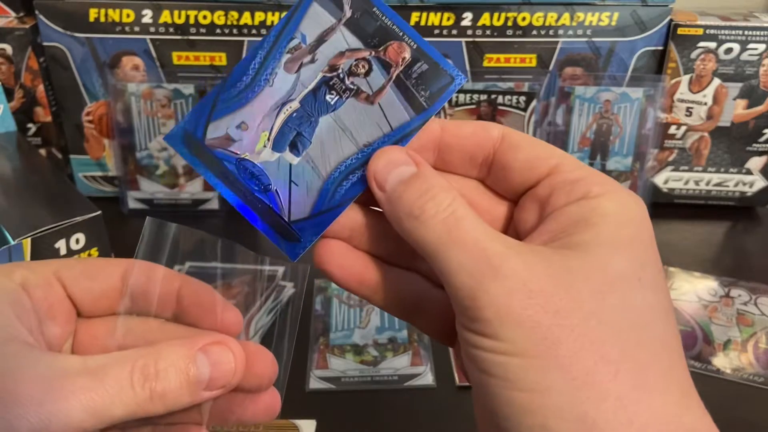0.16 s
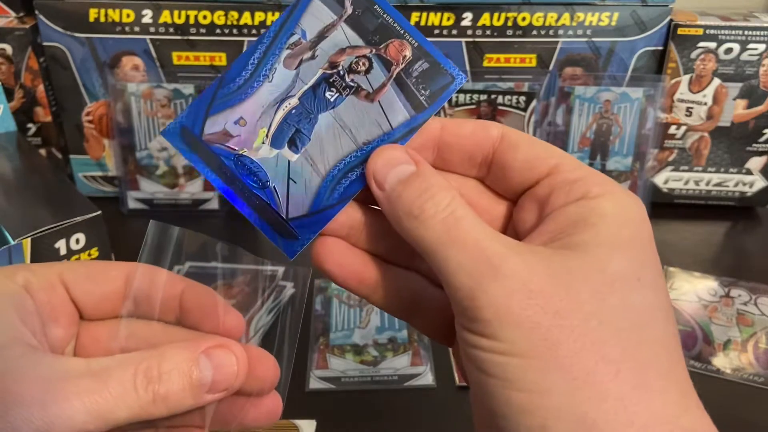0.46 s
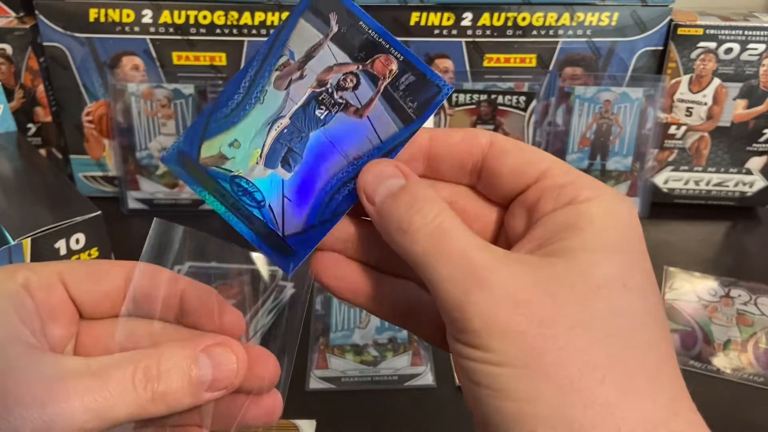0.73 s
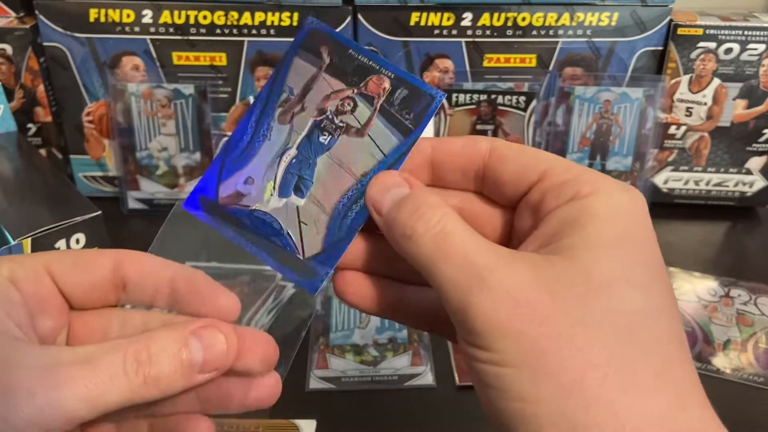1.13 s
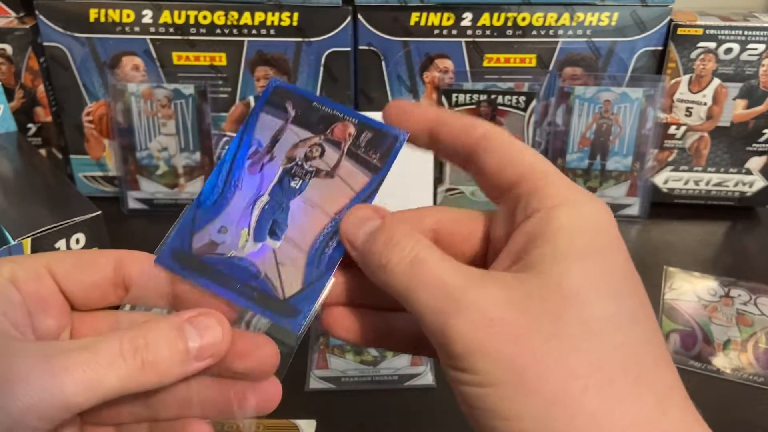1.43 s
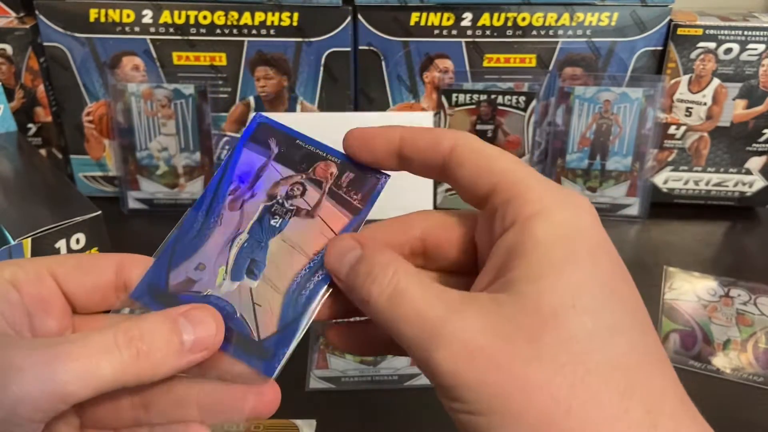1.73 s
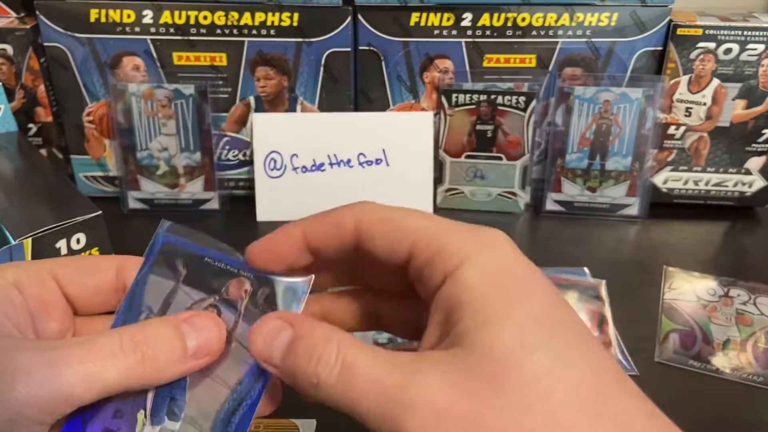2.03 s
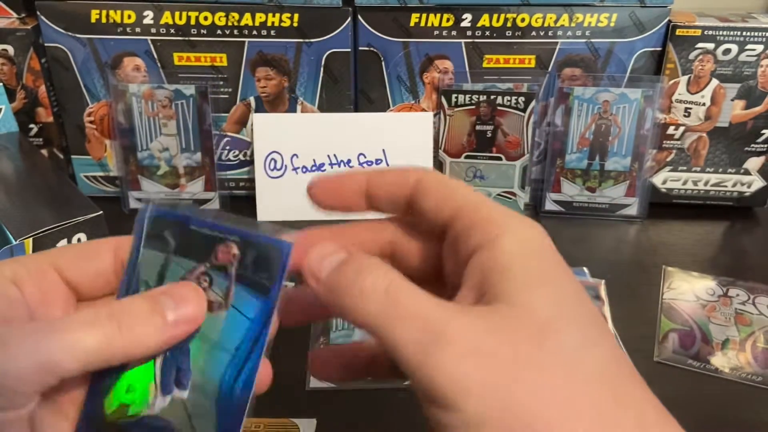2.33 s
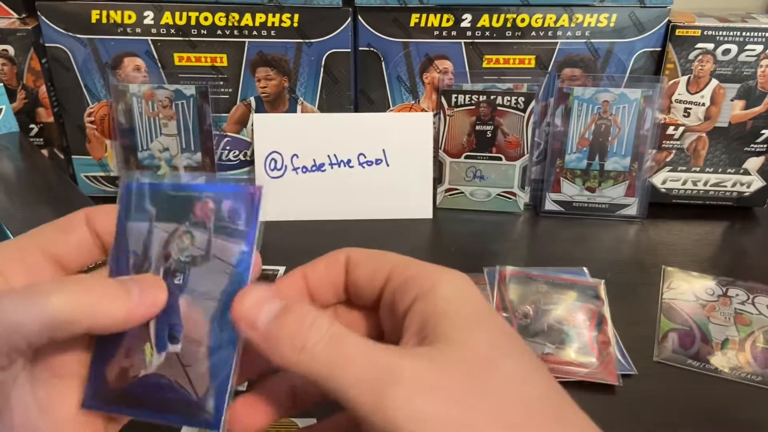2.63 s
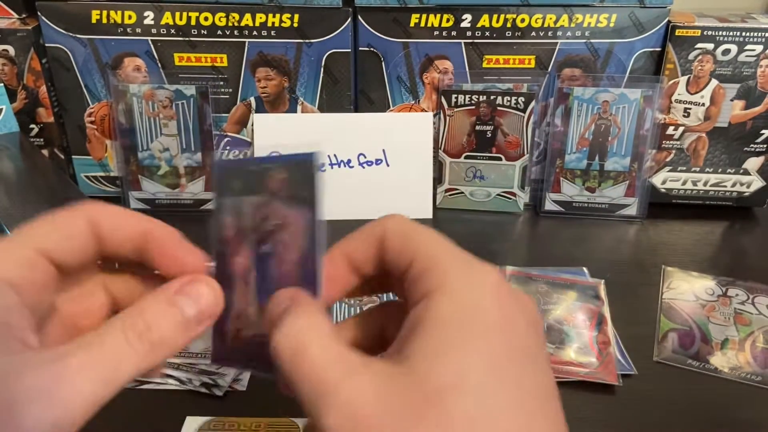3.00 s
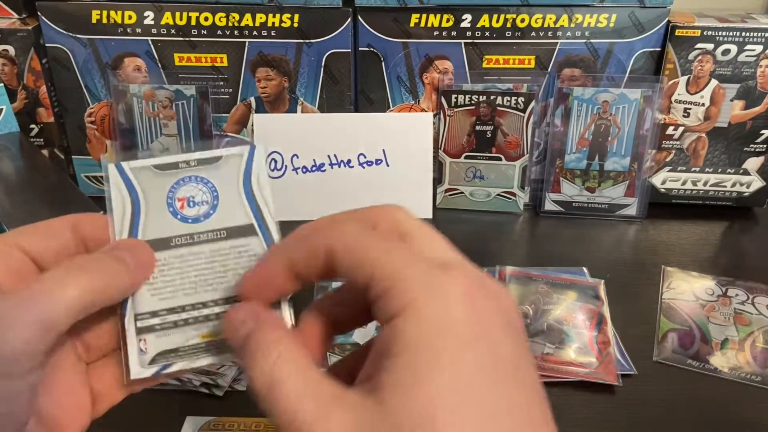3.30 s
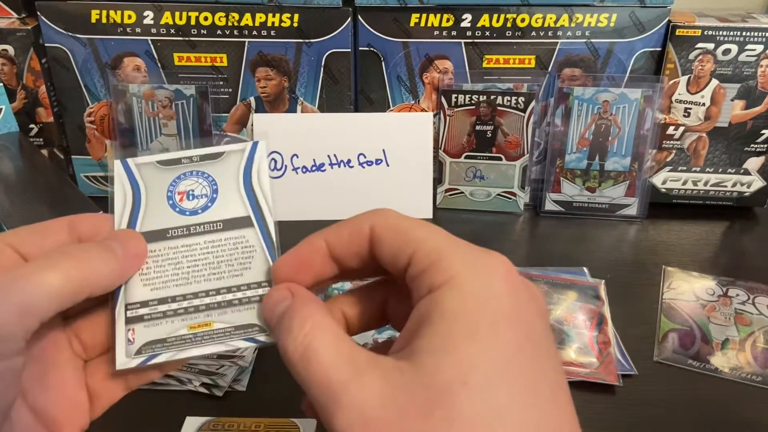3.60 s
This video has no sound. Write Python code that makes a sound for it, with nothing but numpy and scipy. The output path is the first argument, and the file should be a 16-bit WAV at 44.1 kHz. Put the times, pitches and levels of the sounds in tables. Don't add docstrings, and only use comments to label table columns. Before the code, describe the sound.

A thin plastic sleeve crinkles close up in a small room. After isolated ticks near 0.2 and 0.35 s, scraping and dense crackle fill 0.6-1.0 s, brightest around 0.9. Faint ticks follow to 1.6, then sharp pops at 1.8-2.3. A quieter gap leads to a snap and soft table knock at 3.0, with last crackles until 3.6. A low, uneven engine drone and faint hiss continue underneath.

```python
import sys
import numpy as np
from scipy import signal
from scipy.fft import rfft, irfft, next_fast_len
from scipy.io import wavfile
from scipy.ndimage import uniform_filter1d

SR = 44100
rng = np.random.default_rng(int(sys.argv[2]) if len(sys.argv) > 2 else 0)


def waveform_to_disk(signal):
    frames = np.transpose(np.atleast_2d(signal))
    scaled = np.clip(frames, -1, 1) * 32767
    samples = np.round(scaled).astype(np.int16)
    wavfile.write(sys.argv[1], SR, samples)


def natural_amplitude(level_db):
    exponent = np.asarray(level_db, float) / 20
    return 10 ** exponent


N = 165375
SIZE = next_fast_len(N + SR // 2)
HZ = np.arange(SIZE // 2 + 1) * SR / SIZE + 1e-3
T = np.arange(N) / SR
LEFT_RIGHT = np.array([[1], [-1]])
ALIKE_HZ = 5000


def unit(x):
    return x / np.sqrt(np.mean(x ** 2))


def shape(x, response):
    return irfft(rfft(x, SIZE) * response, SIZE)[..., :N]


def colour(points):
    hz, db = np.array(points).T
    return natural_amplitude(np.interp(np.log(HZ), np.log(hz), db, left=-90, right=-120))


def walk(rate):
    hold = int(SR / rate)
    steps = np.repeat(rng.standard_normal(N // hold + 1), hold)
    return 0.96 * uniform_filter1d(uniform_filter1d(steps, hold), hold)[:N]


def swell(start, length, rise, fall):
    up = np.sin(np.clip((T - start) / rise, 0, 1) * np.pi / 2) ** 2
    return up * np.exp(-np.clip(T - start - length + fall, 0, None) / fall)


def decay(t, t60):
    return np.exp(-np.log(1000) * t / t60)


def grains():
    per_s, spread_db = 10000, 2.1
    chance, sign, size = rng.random((3, N))
    slips = (chance < per_s / SR) * np.sign(sign - .5)
    return unit(slips * natural_amplitude(-spread_db * np.log(size + 1e-9)))


PART = [0, 0, 1, 1, 1, 1, 2, 2]
LEAN = np.array([[1, 1, .2, 0, 0, 0, 0, 0], [0, 0, 0, 0, .2, .5, 1, 1]])


def band_gain(db, body_db, sizzle_db):
    return natural_amplitude(db + np.array([body_db, sizzle_db]) @ LEAN)


# (t/s, length/s, level/dB, card body re level/dB, sizzle re level/dB)
RUBS = [(0, .015, -60, -2, -30), (0.575, 0.092, -58, -4.5, -7.5), (0.65, 0.088, -59.5, -2.5, -19.5),
        (0.743, 0.051, -57, -0.5, -6.5), (0.785, 0.081, -52, -1.5, -2.5), (0.874, 0.075, -47.5, -10, -1.5),
        (0.932, 0.09, -72.5, 11, -45), (1.027, 0.045, -67.5, -3, -2), (1.119, 0.044, -75.5, -0.5, -2.5),
        (1.181, 0.15, -78.5, -5, 3), (1.351, .15, -69.5, -13.5, -1.5), (1.625, 0.083, -63.5, -8, 5.5),
        (1.804, 0.18, -68, -2.5, 12), (1.985, 0.034, -61, -3, -17.5), (2.054, 0.042, -61.5, -13.5, 1),
        (2.139, 0.025, -65, -17.5, -4), (2.212, 0.026, -68.5, -1.5, 6), (2.306, 0.036, -64.5, -28, -3.5),
        (2.325, 0.17, -84, -10, 4.5), (2.576, 0.088, -78.5, -16, -0.5), (2.686, 0.12, -72, -9.5, 1),
        (2.906, .092, -63, -4.5, -43), (3.048, 0.034, -55.5, -9.5, -10), (3.163, 0.07, -74.5, -12.5, -3),
        (3.325, 0.037, -69.5, -12, 8),
    (3.53, 0.044, -78.5, -0.5, -11),
    (2.79, 0.09, -81, -12, 4),
]
# (t/s, length/s, level/dB)
DRAGS = [
    (0.594, 0.067, -70.5),
    (0.788, 0.052, -69),
    (1.37, 0.075, -69),
    (2.694, .1, -64),
    (3.048, 0.049, -64),
]


def rubbing():
    def stroke(start, length):
        return swell(start, length, 0.38 * length, 0.014)

    env = sum(np.outer(band_gain(db, body_db, sizzle_db), stroke(s, d))
              for s, d, db, body_db, sizzle_db in RUBS)
    env[0] *= natural_amplitude(-4)
    env[0] += sum(natural_amplitude(db) * stroke(s, d) for s, d, db in DRAGS)
    patches = natural_amplitude(3.3 * np.array([walk(50) for _ in PART]))
    stutter = natural_amplitude(4 * walk(59.25))
    return env * patches * stutter * np.array([grains() for _ in range(3)])[PART]


# (t/s, peak level/dB, card body re peak/dB, sizzle re
# peak/dB)
SNAPS = [(0.1924, -59, -7.5, 0), (0.3534, -39, -12, -4), (0.6251, -45.5, -3, -5.5),
         (0.6406, -33.5, -6.5, -16.5), (0.6973, -44.5, -17.5, -4.5), (0.7329, -43.5, -5, -11),
         (0.7483, -34.5, -9.5, -13.5), (0.7694, -45, -0.5, -16), (1.1344, -43, -24, -15.5),
         (1.1564, -54, -19, -15.5), (1.292, -57, -24, -6.5), (1.3848, -53.5, -6, -26),
         (1.4591, -62.5, -20, -22), (1.6135, -43, -10, -3.5),
         (1.8327, -34.5, -7.5, -1.5), (1.9707, -33.5, -15, -23), (1.9723, -31.5, -15, 0.5),
              (2.0705, -44.5, -5.5, -3), (2.158, -45, -32.5, -7), (2.2288, -27, -39, -16.5),
              (2.2381, -44.5, -26, -1.5), (2.327, -53.5, -37.5, -1), (2.6116, -66.5, 0, 21),
              (2.704, -47.5, -9.5, -28.5), (3.0045, -27.5, -9, -21.5), (3.0702, -37.5, -27, -1),
              (3.1539, -49.5, -16.5, 1.5), (3.1606, -40, -21, -2), (3.232, -40.5, -23, -4.5),
              (3.239, -36, -22, 6), (3.356, -47, -44, -7), (3.5618, -65.5, -13.5, -5.5)]
CRACKLES = [(0.6224, -51, -23, -9.5), (0.6314, -47.5, -5.5, -5.5), (0.7166, -45, 1.5, -8),
            (.753, -48.5, -5, -6.5), (0.937, -47, 8.5, -9), (1.121, -55, -7, 0), (1.1295, -58, -11, -5),
            (1.1408, -51, 1.5, -5), (1.243, -67, -18, -6), (1.255, -60.5, -16, 0), (1.264, -57, -15, -5),
            (1.297, -60.5, -14, 2.5), (1.333, -72.5, -5, 3.5), (1.354, -70, -10, 4),
            (1.4008, -54.5, -3.5, -8), (1.659, -52.5, -16, 4), (2.427, -68.5, -3, 6), (2.641, -70, -22, 2),
            (2.7715, -58.5, -13.5, 8), (3.0632, -50.5, -10, -20), (3.171, -52, -13, -9)]


def snaps():
    rise_s, crack_t60_s, crumb_t60_s, crumb_db = 0.00081, 0.0027, 0.026, -10.5
    part_db = np.array((1, -4, -1))[PART]
    tint_db = 2.0
    lead = SR // 100
    t = np.arange(-lead, SR // 8) / SR
    crack, crumbs = decay(t, crack_t60_s), decay(t, crumb_t60_s)
    pop = np.where(t < 0, np.exp(t / rise_s), crack + natural_amplitude(crumb_db) * (crumbs - crack))
    env = np.zeros((8, N + SR // 5))
    rows = SNAPS + CRACKLES
    tints = rng.standard_normal((len(rows), 8))
    for (s, db, body_db, sizzle_db), tint in zip(rows, tints):
        size = band_gain(db, body_db, sizzle_db) * natural_amplitude(part_db + tint_db * tint)
        first = int(s * SR) - lead
        env[:, first:first + len(t)] += np.outer(size, pop)
    return env[:, :N] * rng.standard_normal(N)


# (f/Hz, width/Hz, boost level/dB)
RINGS = [(1006, 123, 10.5), (1870, 66, 7.5), (4740, 320, 4), (7100, 740, -0.5), (11150, 2000, -4)]


def rings(bend):
    response = 1
    for hz, width, db in RINGS:
        detune = (HZ / hz / bend - hz * bend / HZ) * hz / width
        response = response * (1 + (natural_amplitude(db) - 1) / (1 + 1j * detune))
    return response


# (f/Hz, level/dB per Hz)
FILM = [(120, -10), (250, -4), (700, -13.5), (2300, -3.5), (6000, -2.5), (9500, 12), (13000, 6),
        (16000, 6.5)]
EDGES_HZ = np.array([600, 1500, 2600, 4000, 5800, 8300, 11000])


def plastic(drive):
    below = [0 * HZ] + [1 / (1 + (HZ / hz) ** 10) for hz in EDGES_HZ] + [1 + 0 * HZ]
    bands = colour(FILM) * np.diff(below, axis=0)
    power = np.bincount(PART, np.mean(np.abs(bands * rings(0.96)) ** 2, axis=1))
    level_bands = bands / np.sqrt(power[PART, None])
    film = irfft((rfft(drive, SIZE) * level_bands).sum(axis=0), SIZE)[:N]
    bend = np.clip(1 + walk(18), 0, 2)
    out = np.zeros(N)
    for k, ratio in enumerate((.93, 1.03, 1.16)):
        nearness = np.clip(1 - np.abs(bend - k), 0, 1)
        out += shape(film * nearness, rings(ratio))
    return out


# (t/s, peak level/dB, f/Hz, t60/s)
PINGS = [(1.137, -48.5, 6200, 0.0092), (1.14, -49, 2020, 0.022), (1.158, -53, 6200, 0.0067),
         (1.206, -58.5, 6100, 0.0083), (1.234, -59, 3230, 0.0071), (1.28, -54, 6100, 0.0076),
         (1.292, -56.5, 6200, 0.0095), (1.386, -66, 900, 0.0075), (1.44, -57, 720, 0.013),
         (1.9726, -20.5, 12230, 0.0029), (2.952, -49.5, 1140, .02)]


def pings():
    out = np.zeros(N)
    t = np.arange(SR // 20) / SR
    for s, db, hz, t60 in PINGS:
        onset = np.minimum(t * hz / 2, 1)
        first = int(s * SR)
        out[first:first + len(t)] += natural_amplitude(db) * np.sin(2 * np.pi * hz * t) * decay(t, t60) * onset
    return out


# (t/s, level/dB)
KNOCKS = [
    (3.004, -41.5),
]
# (f/Hz, level/dB, t60/s)
TABLE = [(202.3, 0.83, 0.059), (325, -1.3, 0.02)]


def knocks():
    out = np.zeros(N)
    for s, level_db in KNOCKS:
        t = np.clip(T - s, 0, 1)
        for (hz, db, t60), drift in zip(TABLE, rng.standard_normal(len(TABLE))):
            tone = np.sin(2 * np.pi * hz * (1 + 0.01 * drift) * t)
            out += natural_amplitude(level_db + db) * tone * decay(t, t60)
    return out


# (t/s, length/s)
TREBLE_TURNS = [(.57, .1), (.68, .1), (1.12, .04), (1.23, .13), (1.82, .02), (1.962, .018), (2.06, .11),
                (2.2, .045), (2.6, .05), (3.055, .035), (3.148, .02), (3.225, .025), (3.34, .035)]


def treble_turns(hands):
    treble = shape(hands, 1 / (1 + (7500 / HZ) ** 8))
    turns = sum((-1) ** k * swell(s, d, .004, 0.0027) for k, (s, d) in enumerate(TREBLE_TURNS))
    return LEFT_RIGHT * (.24 * turns * treble)


def room(hands):
    t60_s, level_db, damp_hz = 0.26, -10, 9600
    t = np.arange(SR // 2) / SR
    tail = rng.standard_normal((2, len(t))) * decay(t, t60_s) * (t > .003)
    tail = tail / np.sqrt(np.sum(tail ** 2) / 2)
    mid, side = rfft(tail, SIZE) / (1 + (HZ / damp_hz) ** 2)
    side = side / (1 + (HZ / ALIKE_HZ) ** 3)
    return natural_amplitude(level_db) * shape(hands, np.array([mid + side, mid - side]))


# (t/s, firing f/Hz, level/dB, octave level/dB)
ENGINE = [(0, 49.9, -51.5, -47), (0.17, 49.79, -41, -44), (.7, 48.68, -43, -51.5), (.95, 49.06, -50.5, -58),
          (1.349, 46.29, -47.5, -57), (1.478, 46.26, -71, -81), (1.619, 47.42, -51.5, -59),
          (1.951, 47.58, -54, -59.5), (2.17, 51.44, -61.5, -48.5), (2.548, 58.02, -50.5, -62.5),
          (2.802, 56.87, -78, -61), (3.049, 55.05, -45, -54), (3.551, 49.73, -62.5, -50.5),
          (3.75, 48, -67.5, -64.5)]


def engine():
    table = np.array(ENGINE)

    def read(col):
        return uniform_filter1d(np.interp(T, table[:, 0], table[:, col]), SR // 40)

    phase = 2 * np.pi * np.cumsum(read(1) * (1 + 0.01 * walk(8.75))) / SR
    out = sum(natural_amplitude(read(k + 1) + 3.5 * walk(9.5)) * np.sin(k * phase + k) for k in (1, 2))
    return np.sqrt(2) * out


# (t/s, length/s, f/Hz, sag/Hz per s, level/dB)
PASSER = (.83, .42, 84, -10, -46)


def passer():
    s, d, hz, sag, db = PASSER
    t = T - s
    level = natural_amplitude(db + 2 * walk(9.13)) * swell(s, d, 0.058, 0.054)
    return np.sqrt(2) * level * np.sin(2 * np.pi * (hz + sag * t / 2) * t)


# (f/Hz, level/dB per Hz)
FLOOR = [(22, -41.5), (48, 4.5), (68, -4), (125, -12.5), (170, -27.5), (400, -52)]


def street_rumble():
    widths = np.array([1 + 0 * HZ, np.minimum(HZ / 487, 1)])
    mid, side = shape(rng.standard_normal((2, N)), colour(FLOOR) * widths)
    level = natural_amplitude(-53 + 2.5 * walk(2.7) + 2.5 * walk(26.05))
    fade = np.clip((N / SR - T) / 0.17, .2, 1)
    return unit(mid + LEFT_RIGHT * side) * level * fade


# (f/Hz, level/dB per Hz)
HISS = [(130, 14), (340, 22), (600, 6.5), (1500, 0), (7000, -5), (12500, -5.5), (16000, -18.5)]


def hiss():
    widths = 1 / np.array([1 + 0 * HZ, 1 + (HZ / ALIKE_HZ) ** 6])
    mid, side = shape(rng.standard_normal((2, N)), colour(HISS) * widths)
    return natural_amplitude(-76.5) * unit(mid + 0.64 * LEFT_RIGHT * side)


# (t/s, length/s, from f/Hz, to f/Hz, level/dB, roughness from 0 = clear to about 1 = hoarse)
BIRD = [
    (0.297, 0.14, 2950, 3350, -84, 0),
    (0.454, 0.15, 4260, 3900, -82, 1.16),
]


def bird():
    out = np.zeros(N)
    for s, d, hz, end_hz, db, rough in BIRD:
        glide = hz + (end_hz - hz) * np.clip((T - s) / d, 0, 1)
        hoarse = 1 - rough + rough * walk(760)
        whistle = np.sin(2 * np.pi * np.cumsum(glide) / SR)
        out += natural_amplitude(db) * hoarse * swell(s, d, 0.032, .006) * whistle
    return np.sqrt(2) * out


def scene():
    hands = plastic(rubbing() + snaps()) + knocks() + pings()
    near = hands + treble_turns(hands) + room(hands)
    return near + engine() + passer() + street_rumble() + hiss() + bird()


def low_pass(x):
    return signal.sosfilt(signal.butter(12, 16430, fs=SR, output="sos"), x)


# (f/Hz, half turns that left leads)
PORTS = [(0, 0), (3450, -.2), (5700, -.35), (6900, .1), (8250, .97), (9850, 1.04), (11600, 2), (13400, 2),
         (14400, 3)]
LEFT_DB = (1.0, -1.2, 0)


def record(dry):
    port_hz, half_turns = np.array(PORTS).T
    left_db = np.interp(np.log(HZ), np.log([80, 700, 7000]), LEFT_DB)
    lead = np.interp(HZ, port_hz, half_turns)
    port = natural_amplitude(left_db / 2) * np.exp(.5j * np.pi * lead)
    mix = shape(dry, np.array([port, 1 / port]))
    return low_pass(mix)


dry = scene()
out = record(dry)
waveform_to_disk(out)
```